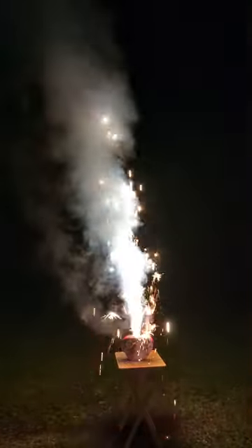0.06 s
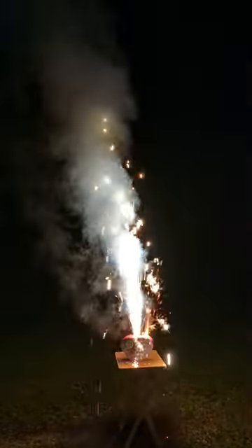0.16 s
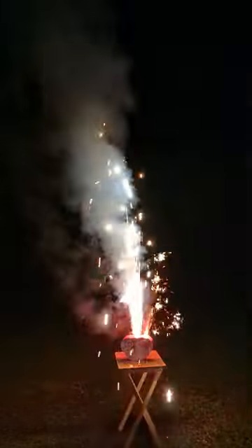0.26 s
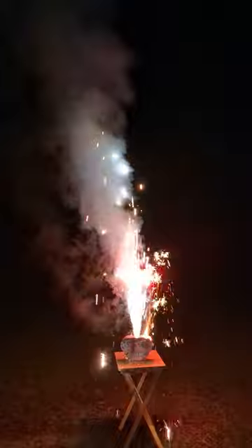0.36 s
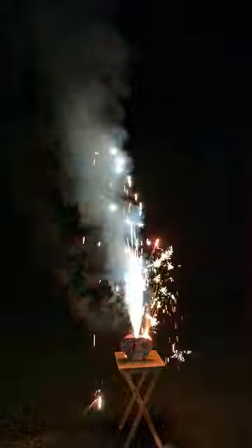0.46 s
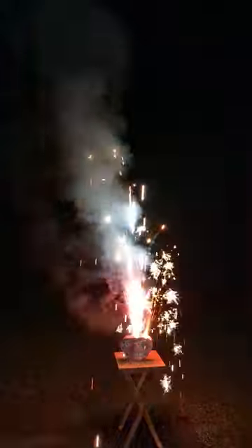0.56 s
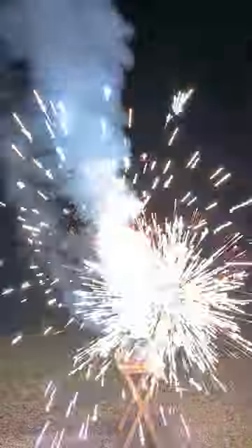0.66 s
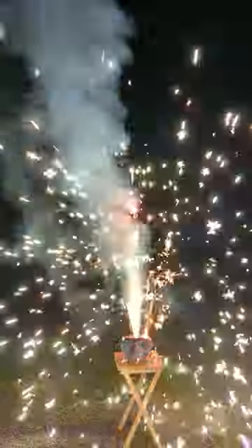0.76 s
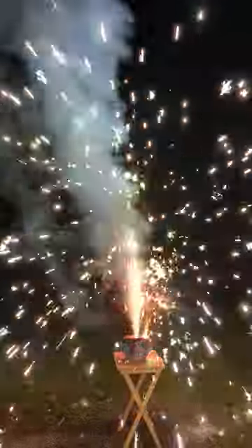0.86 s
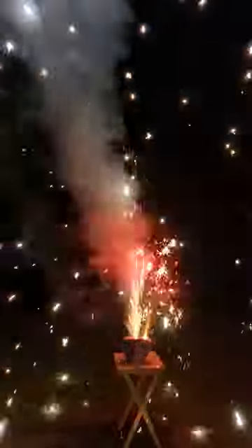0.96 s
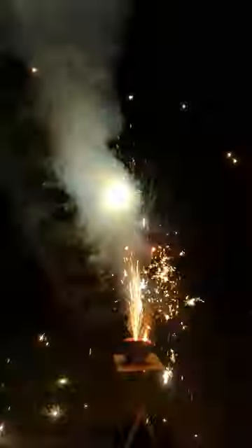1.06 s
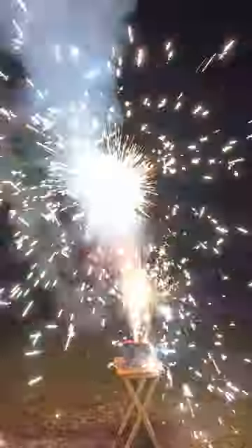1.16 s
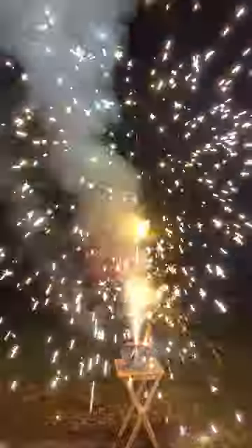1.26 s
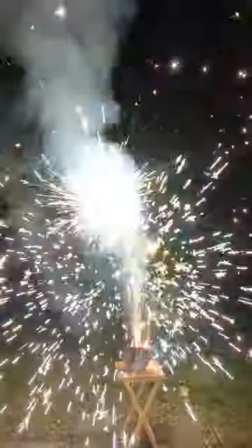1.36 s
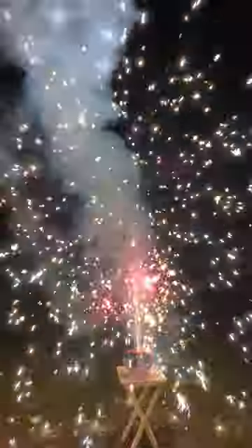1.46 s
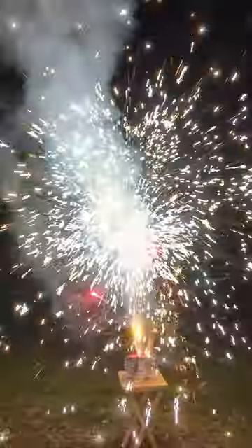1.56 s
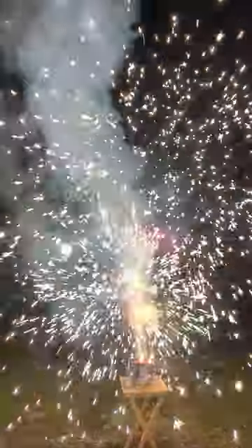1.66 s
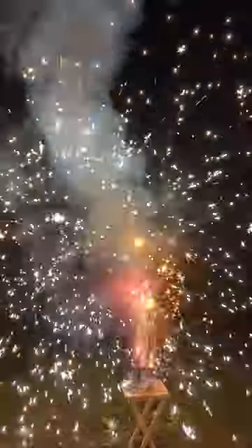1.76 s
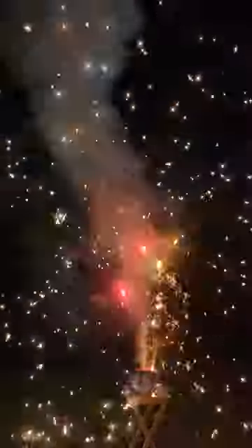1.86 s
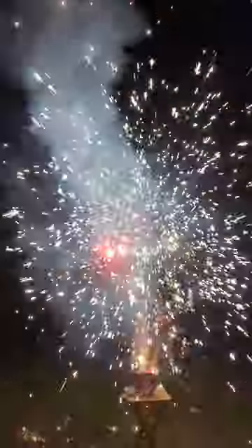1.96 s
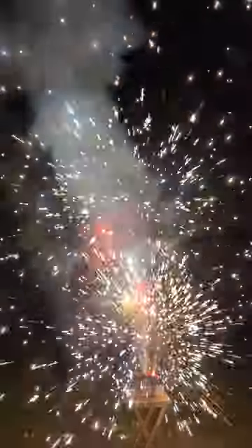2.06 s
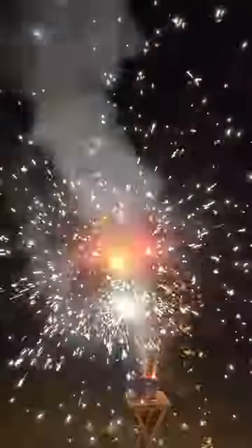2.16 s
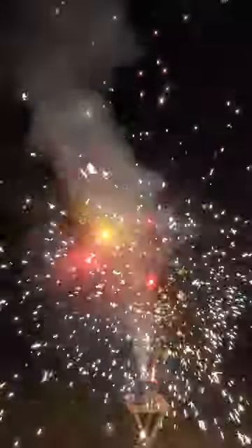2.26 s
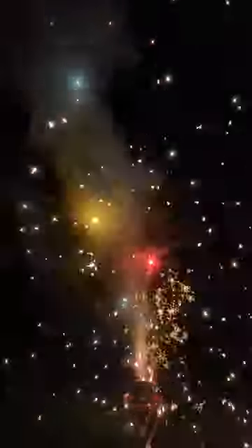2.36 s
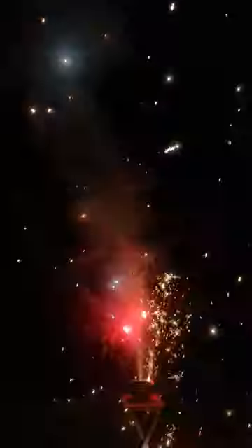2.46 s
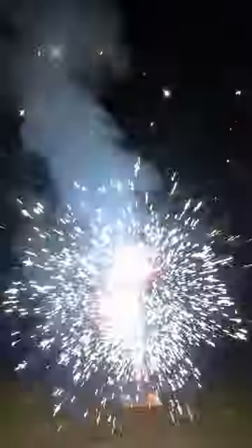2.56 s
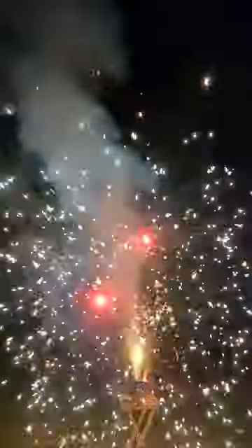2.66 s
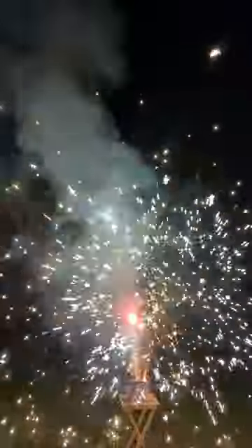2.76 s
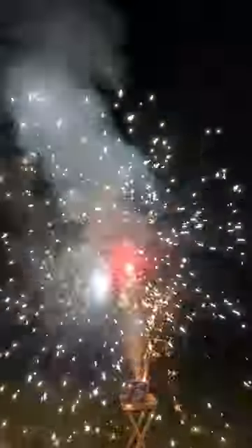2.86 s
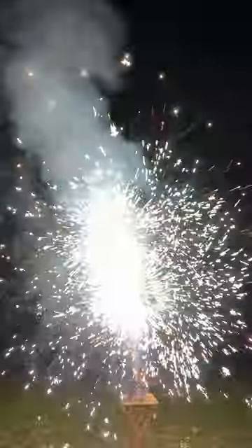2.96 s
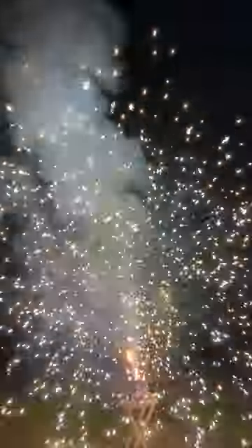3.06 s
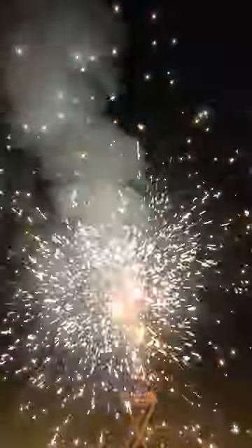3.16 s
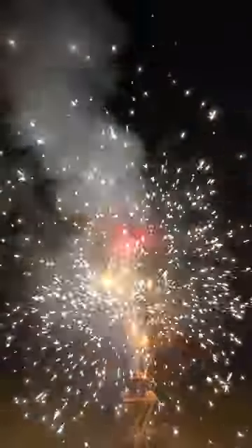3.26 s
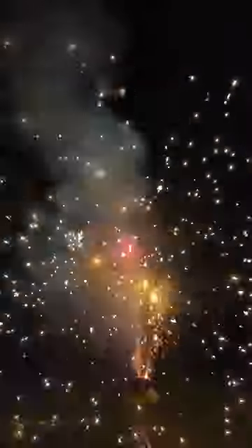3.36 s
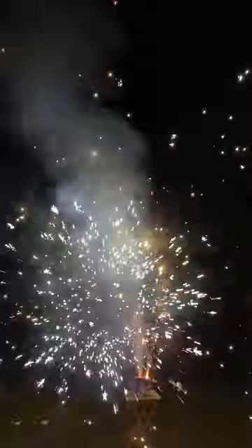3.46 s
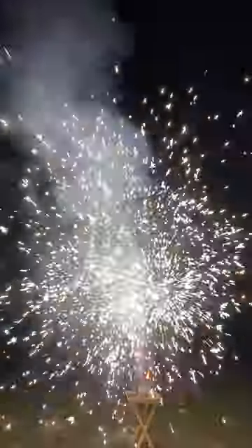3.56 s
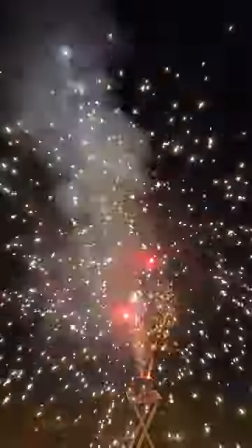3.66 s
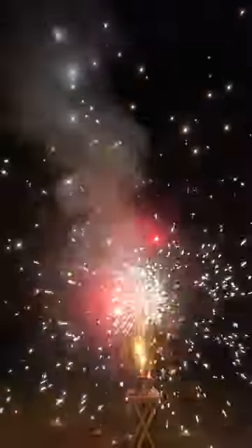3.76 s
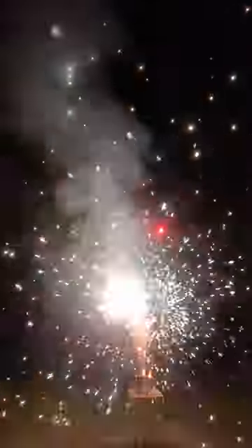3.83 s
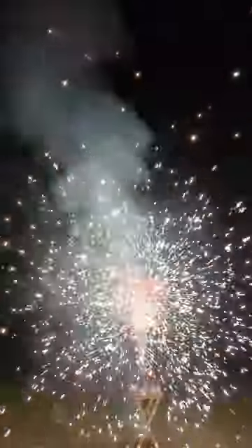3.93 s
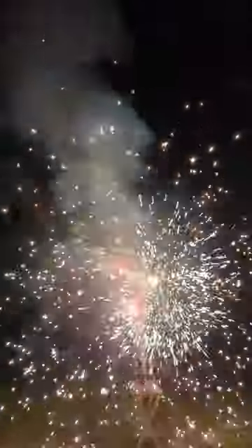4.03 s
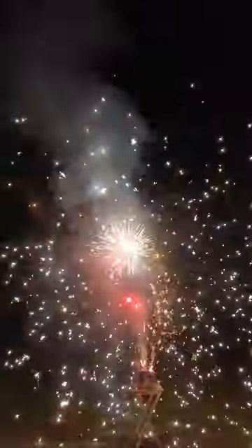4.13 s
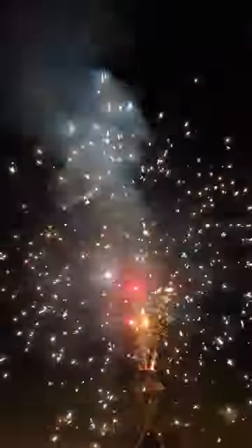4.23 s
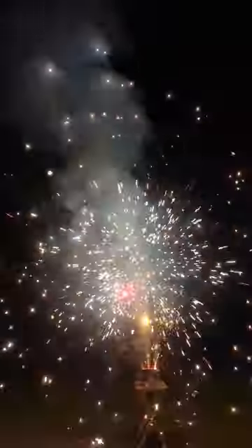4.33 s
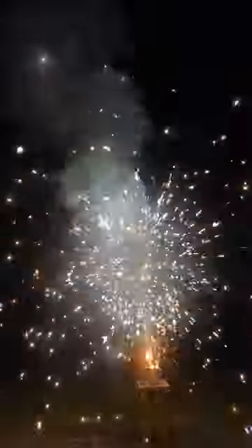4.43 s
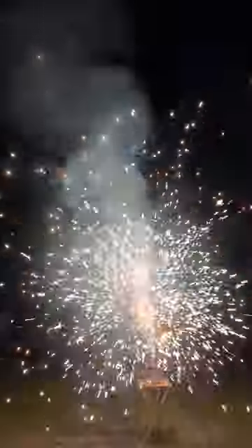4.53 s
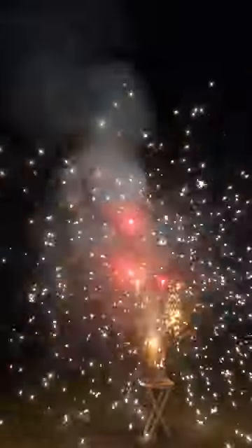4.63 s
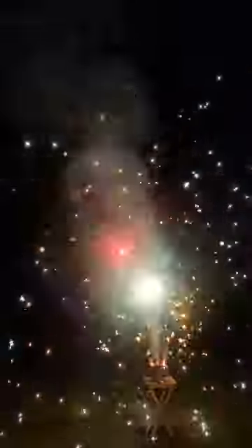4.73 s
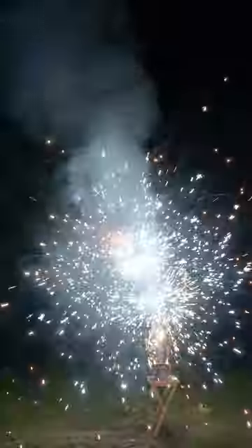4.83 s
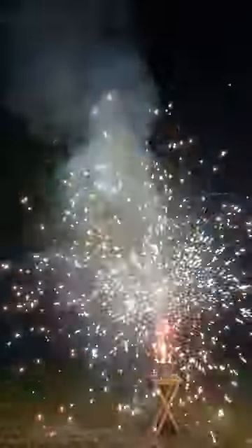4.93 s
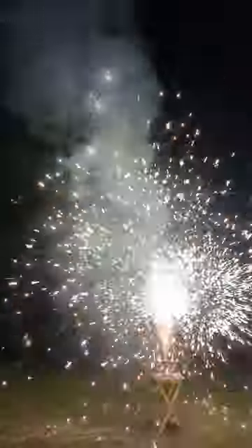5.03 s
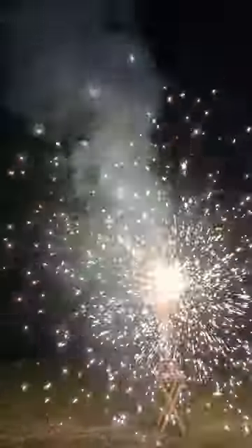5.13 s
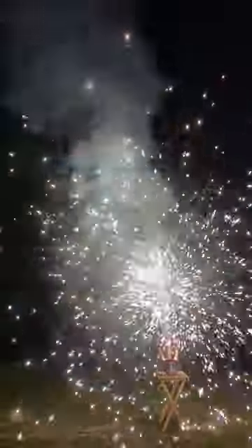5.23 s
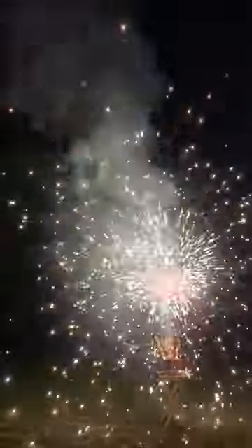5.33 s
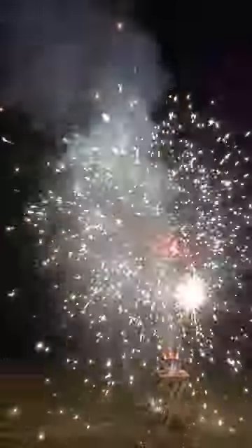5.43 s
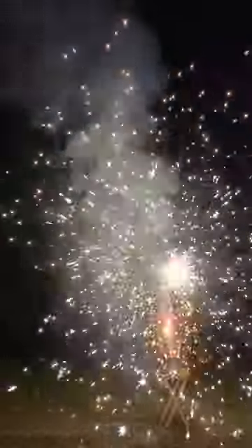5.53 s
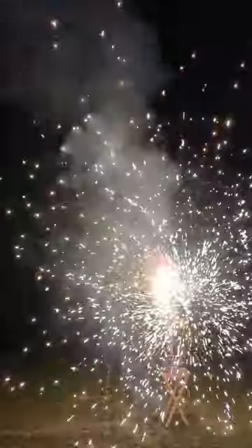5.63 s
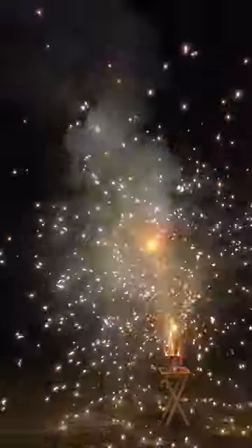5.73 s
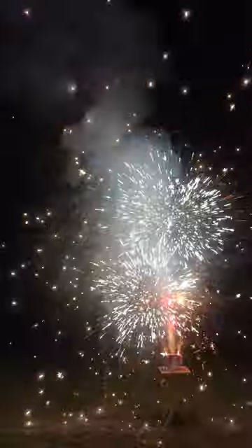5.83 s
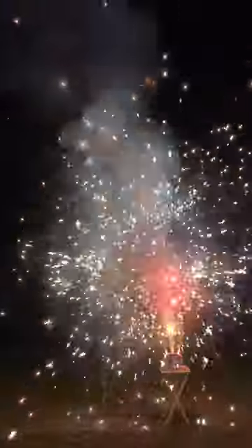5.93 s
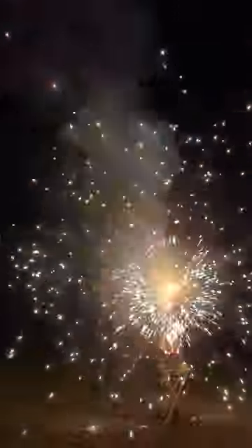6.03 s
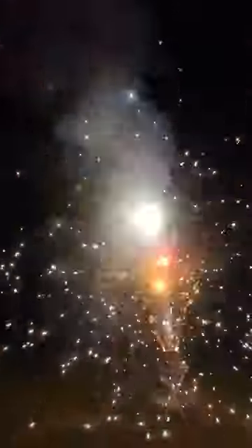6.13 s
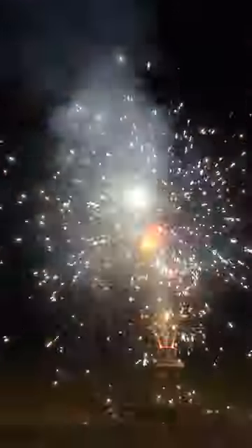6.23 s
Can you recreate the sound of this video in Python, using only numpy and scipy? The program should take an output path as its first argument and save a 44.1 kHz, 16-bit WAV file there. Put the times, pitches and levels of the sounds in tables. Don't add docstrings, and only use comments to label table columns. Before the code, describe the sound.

A fountain firework hisses faintly, then bursts into a dense, irregular run of sharp cracks and fizzing spark sprays, close up outdoors at night.

```python
import sys
import numpy as np
from scipy import signal
from scipy.fft import rfft, irfft, next_fast_len
from scipy.io import wavfile
from scipy.ndimage import uniform_filter1d

SR = 44100
rng = np.random.default_rng(int(sys.argv[2]) if len(sys.argv) > 2 else 0)


def output_pcm(signal):
    pcm = np.clip(np.atleast_2d(signal).T, -1, 1) * 32767
    wavfile.write(sys.argv[1], SR, np.round(pcm).astype(np.int16))


def elevation(decibels):
    levels = np.asarray(decibels, float)
    return 10 ** (levels / 20)


N = 277389

# (t/s, left push, right push, left ring, right ring)
BLASTS = [(0.647, 0, 0, 2.8, 2.4), (0.8353, 0, 0.015, 0, -0.15), (1.1408, 0.016, 0.015, -1.1, -0.8),
          (1.2102, -0.308, 0, 4.262, 0), (1.4217, 0, 0.015, 0, -0.1), (1.6411, 0.008, 0.04, 0, -0.4),
          (1.6893, 0.023, 0, -0.152, 0), (1.7293, -0.138, 0, 0.885, 0), (2.1641, 0.03, 0, -0.178, 0),
          (2.2176, -0.292, 0, 1.429, 0), (2.8344, -0.33, 0, 2.501, 0), (2.9305, 0.208, 0, -0.95, 0),
          (2.9369, 0.259, 0, -1.401, 0), (3.604, 0, 0.012, 0, -0.1), (3.9702, 0, 0.05, 0, -0.3),
          (4.1829, -0.02, 0, 0.3, 0), (4.3503, 0.022, -0.033, -0.5, 0.45), (4.793, 0, 0.015, -0.193, 0),
          (4.8243, -0.233, 0, 1.311, 0), (5.3657, 0.071, 0, -0.208, 0), (5.4053, -0.176, 0, 1.635, 0),
          (5.6598, 0, 0.02, 0, -0.11), (5.9016, 0.075, 0, -0.348, 0), (6.1912, -0.266, 0, 1.385, 0)]


def evened(x):
    return x / np.sqrt(np.mean(x ** 2) + 1e-20)


def read(points, hz):
    f, *values = np.transpose(points)
    return np.array([np.interp(np.log(hz + 1), np.log(f + 1), v) for v in values])


def train(seconds, sizes):
    out = np.zeros(N)
    np.add.at(out, np.round(np.asarray(seconds) * SR).astype(int), sizes)
    return out


def stars():
    # (t/s, spark spray level/dB, excess over the limiter ceiling/dB)
    heavy = [
        (0.647, -23.5, 8.5),
        (1.2082, -26, 15),
        (2.8364, -24, 8.5),
        (2.9369, -22.5, 26),
    ]
    full = [
        (2.1641, -26, 11),
        (3.8925, -22, 25),
        (5.6247, -22.5, 20),
        (6.0638, -24, 10.5),
        (6.1912, -23, 12),
    ]
    deep = [(0.8353, -22.5, 14), (1.1408, -22.5, 21), (1.4217, -22, 17), (1.6411, -25.5, 13.5),
            (1.6893, -31, 9.5), (2.2176, -28, 13), (2.563, -28, -1), (2.582, -25.5, 34),
            (2.7634, -25.5, 8.5), (2.9301, -23, -4), (3.5583, -25.5, 16), (3.9702, -37, 5),
            (4.3503, -23, 13.5), (4.793, -29, 1), (4.8242, -29.5, 11.5), (5.3657, -27, 11),
            (5.4053, -25, 13.5), (5.6598, -32, 16.5)]
    plain = [(1.5966, -38, 17), (0.6851, -25, 20.5), (1.3515, -23.5, 19), (1.4047, -35, 24),
             (1.5506, -18.5, 21), (1.5765, -33, 40), (1.938, -29.5, 7), (1.9645, -27.5, 16),
             (2.0819, -20.5, 27), (2.0864, -45, 5), (2.5922, -28.5, 23), (2.9828, -29, 13),
             (3.0085, -36, 16), (3.1777, -23.5, 7), (3.1939, -26, 19), (3.5311, -24.5, 13),
             (3.9076, -32, 12), (4.0509, -23, 14.5), (4.0561, -47, 5), (4.1829, -27, 8), (4.5297, -44, 6),
             (4.5498, -21, 11), (5.152, -20.5, 20), (5.183, -36, 17.5), (5.8674, -22, 9),
             (1.7293, -24.5, 15), (5.9016, -50, 18)]
    thin = [(1.1202, -28.5, 4), (1.9481, -27.5, 19), (2.25, -25.5, 18), (2.9766, -30, 22),
            (2.9989, -21, 15), (3.1707, -22.5, 13), (3.2506, -25, 14), (3.2825, -27.5, 14),
            (3.4602, -30.5, 10.5), (3.5514, -21.5, 29), (3.604, -31, 14), (3.7548, -25, 11.5),
            (3.812, -27.5, 18.5), (3.9789, -21, 12), (4.2973, -37, 6), (4.4447, -25.5, 13),
            (4.9219, -27.5, 16), (5.0147, -26, 16), (5.028, -25, 17), (5.242, -29.5, 19.5),
            (5.2666, -30, 13.5), (5.4854, -25, 11), (5.5822, -25.5, 21), (5.8561, -42, 10),
            (6.237, -25, 20.5)]
    dry_stars = [
        (3.785, -34, 5),
        (3.8648, -42, 14),
        (5.0488, -36, 13),
        (5.0802, -29.5, 11.5),
        (5.5304, -29, 15),
    ]
    faint = [(2.6037, -30.5, 14), (5.3396, -45, 6), (4.16, -45, 5), (1.3, -32.5, 0), (1.51, -45, -3),
             (2.2021, -30, -3), (2.39, -41, 3.5), (3.9156, -31, 13), (4.8725, -26, 18)]
    spits = [
        (0.2765, -70, 0),
        (0.5775, -70, 0),
    ]
    # (crack peak after the limiter/dB, low body level/dB)
    kinds = [
        (-19, 11),
        (-13, 5),
        (-13, 2),
        (-13, 0.2),
        (-13, -3),
        (-14.5, -7),
        (-19.5, -1.1),
        (-31, -14),
    ]
    groups = (heavy, full, deep, plain, thin, dry_stars, faint, spits)
    bursts = []
    for group, kind in zip(groups, kinds):
        bursts += [tuple(star) + tuple(kind) for star in group]
    bursts = np.array(sorted(bursts))
    for s, *_ in BLASTS:
        bursts[abs(bursts[:, 0] - s) < .0025, 0] = s
    return bursts


def cracks(bursts, smear_s=0.0007, tail_db=-22, tail_s=.03, gain_db=0.07, echo_db=0.5):
    # (f/Hz, left level/dB, right level/dB)
    crack = [(150, 7, 12), (350, 12, 13), (700, 13, 13), (1200, 11, 8), (2000, 11, 3), (3200, 8, 0),
             (5000, 7, 1), (7000, 7, 0), (9000, 7, 2), (11000, 11, 4), (13000, 8, 4), (14300, 4, 2),
             (15500, 2, 0), (16500, -7, -10)]
    # (f/Hz, left level/dB, right level/dB)
    ground = [(150, 6, 12), (350, 9, 9), (700, 10, 10), (1200, 8, 9), (2000, 6, 6), (3200, 2, 5),
              (5000, 1, 4), (7000, 1, 8), (9000, 1, 9), (11000, 2, 10), (13000, -2, 4), (14300, -5, 0),
              (15500, -6, -1), (16500, -16, -10)]
    lowest_ms, higher_ms, vary_db = 2.15, .15, .8
    later_ms = np.array([[.5], [0]])
    snap, lull_s, edge_hz = .4, .11, 15800
    size, lead, turns = 2048, 200, .43
    hz, t = np.fft.rfftfreq(size, 1 / SR), np.arange(size) / SR
    lag = np.exp(-2j * np.pi * (turns * (np.log((hz + 30) / 8000) + 1) + hz * lead / SR))
    direct = elevation(read(crack, hz)) * lag
    echo_colour = elevation(read(ground, hz) + echo_db) * lag
    blur = np.exp(-t / .00025)
    count = len(bursts)
    rough, scatter = rng.standard_normal((count, 2, 2, size)).transpose(1, 0, 2, 3)
    gaps = np.diff(bursts[:, 0], prepend=0)
    heights, sizes = rng.standard_normal((count, 2)).T
    out = np.zeros((2, N + size))
    for (s, *_, db, body_db), gap, high, big, grass, air in zip(bursts, gaps, heights, sizes, rough, scatter):
        echo_ms = lowest_ms + higher_ms * high ** 2
        shaded = rfft(abs(air[0]) * np.sign(grass[0] + 1) * blur)
        shaded = np.where(hz > 2500, shaded / np.sqrt(np.mean(abs(shaded) ** 2)), 1)
        shock = direct * np.array([np.ones_like(shaded), shaded])

        after = np.maximum(t - (echo_ms + later_ms) / 1000, 0)
        bounce = grass * (after > 0) * np.exp(-after / smear_s)
        bounce *= np.sqrt(1 - snap ** 2) / np.linalg.norm(bounce, axis=1, keepdims=True)
        bounce += snap * (after > 0) * (after <= 1 / SR)
        bounce += air * (after > 0) * elevation(tail_db - 60 * after / tail_s)

        top = (hz < edge_hz) | (gap > lull_s)
        tone = top * elevation(body_db / (1 + (hz / 1500) ** 2))
        burst = irfft(tone * (shock + rfft(bounce) * echo_colour))
        at = round(s * SR) - lead
        level = elevation(db + vary_db * big + gain_db)
        out[:, at:at + size] += (level * burst)[:, :N + size - at]
    return out[:, :N]


def sparks(bursts, catch_s=0.02, gain_db=2.0):
    # (f/Hz, level per Hz/dB)
    fizz = [(60, -21), (180, -15.5), (400, -15.5), (900, -9.5), (2100, -3.5), (4300, -4), (5600, -3),
            (6800, 1), (8200, -1.5), (10800, 6), (12500, 2), (14000, -7), (15200, -3.5), (17000, -30)]
    # (band top f/Hz, t60/s, left-right likeness, left-right level/dB)
    burn = [(556, 0.75, 0.96, -1), (1497, 0.87, 0.42, -1.5), (4040, 0.72, 0.0063, -3.5),
            (9780, 0.58, 0.032, -2.5), (13000, 0.43, 0.05, -1.5), (20000, 0.42, .03, 0)]
    s, spray_db = bursts.T[:2]
    pops_per_s, spread_db = 18000, 1.3
    size = next_fast_len(N)
    hz, t = np.fft.rfftfreq(size, 1 / SR), np.arange(SR) / SR
    chance = rng.random((N, 3)).T
    height = rng.standard_normal((N, 3)).T
    big = rng.exponential(1, (N, 3)).T
    pops = (chance < pops_per_s / SR) * height * elevation(spread_db * np.minimum(big, 4))
    z = rfft(pops, size) * elevation(read(fizz, hz))
    z /= np.sqrt(np.mean(irfft(z, size) ** 2))
    lit = train(s, elevation(2 * spray_db))
    out, low = np.zeros((2, N)), 0
    for top, t60, same, pan_db in burn:
        own_left, own_right, shared = irfft(z * ((hz >= low) & (hz < top)), size)[:, :N]
        same, low = np.clip(same, 0, 1), top
        swell_and_die = (1 - np.exp(-t / catch_s)) ** 2 * elevation(-120 * t / t60)
        power = signal.oaconvolve(lit, swell_and_die)[:N]
        band = np.sqrt(1 - same) * np.array([own_left, own_right]) + np.sqrt(same) * shared
        out += band * np.sqrt(abs(power)) * elevation([[pan_db / 2], [-pan_db / 2]])
    return elevation(gain_db) * out


def jolts(bursts, late_s=.00018, blunt_hz=480., turns=.243, case_hz=75.3, case_q=1.43):
    nudge_push, nudge_ring = 0.0065, 0.024
    ring_hz, swell_s, die_s, crest_s = 51.6, .03, .01185, .00884
    lead, shift = 60, .076
    floor_s, floor = .0029, -.16
    nudges = [(s, nudge_push, nudge_push, *nudge_ring * rng.standard_normal(2))
              for s, *_, db, _ in bursts if db > -30]
    s, *ports = np.transpose(list(BLASTS) + nudges)
    hz, t = np.fft.rfftfreq(4096, 1 / SR), np.arange(4096) / SR
    lag_turns = turns * np.log((hz + 30) / 1000) + shift + hz * (late_s + lead / SR)
    lag = np.exp(-2j * np.pi * lag_turns)
    w = 1j * hz / case_hz
    bass_cut = w * w / (w * w + w / case_q + 1)
    shove = irfft(bass_cut / (1 + (hz / blunt_hz) ** 2) * lag)
    slope = np.gradient(shove)
    echo = floor * np.roll(slope / slope.max(), round(floor_s * SR))
    shove = elevation(1.5) * shove / shove.max() + echo
    ring = np.exp(-t / die_s) * (1 - np.exp(-t / swell_s)) ** 2 * np.cos(2 * np.pi * ring_hz * (t - crest_s))
    out = []
    for push, swing in zip(ports[:2], ports[2:]):
        thump = signal.oaconvolve(train(s, push), shove)[lead:N + lead]
        out.append(thump + signal.oaconvolve(train(s, swing), ring)[:N])
    return np.array(out)


def flame(patchy_db=.6):
    # (f/Hz, left level per Hz/dB, right level per Hz/dB)
    hiss = [(30, -33, -34), (60, -19, -19), (150, -17, -16), (235, -29, -30), (520, -9, -11),
            (760, -15, -16), (1120, -13, -8), (1260, -13, -13), (1410, -8, -11), (1650, -21, -16),
            (2000, -17, -17), (4000, -25, -26), (11000, -27, -27), (15500, -33, -33)]
    # (f/Hz, width/Hz, level/dB)
    tube = [(231, 74, -15), (352, 260, 5), (730, 100, -3), (1292, 103, -26), (1398, 63, 7), (1800, 120, -3),
            (2620, 370, -4), (3500, 300, 6), (5570, 900, 0), (11800, 1400, 2.5), (5300, 150, -5),
            (5800, 150, -7)]
    # (f/Hz, left-right likeness)
    likeness = [(60, 1), (180, 0.91), (550, 0.98), (1650, 0.12), (4970, -0.25), (15000, -0.22)]
    # (t/s, level/dB)
    strength = [
        (0, -49.5),
        (.3, -49),
        (.62, -47),
        (1, -43),
        (2.5, -47),
        (4.7, -49),
        (6.29, -49),
    ]
    frames, hz = N // 256 + 5, np.fft.rfftfreq(1024, 1 / SR)
    a, b, c, d, patches = rng.standard_normal((frames, 513, 5)).T
    patches = evened(uniform_filter1d(uniform_filter1d(patches, 10, 0), 12, 1))
    same = np.clip(read(likeness, hz)[0], -1, 1)[:, None]
    left = a + 1j * b
    right = same * left + np.sqrt(1 - same ** 2) * (c + 1j * d)
    tube_db = sum(db * np.exp(-(2 * (hz - f) / width) ** 2) for f, width, db in tube)
    colour_db = (read(hiss, hz) + tube_db)[:, :, None]
    z = np.array([left, right]) * elevation(colour_db + patchy_db * patches)
    level_db = np.interp(np.arange(N) / SR, *np.transpose(strength))
    return elevation(level_db) * evened(signal.istft(z, nperseg=1024, noverlap=768)[1][:, :N])


def dips(bursts, back_s=0.017):
    before, after = 1000, 3000
    ahead_s, early_s, bend = .015, .0015, 1.2
    t, dip_db = np.arange(-before, after) / SR, np.zeros(N + after)
    sink = np.clip((t + ahead_s) / (ahead_s - early_s), 0, 1) ** bend
    shape = np.where(t < 0, sink, np.exp(-t / back_s))
    for s, _, excess_db, *_ in bursts:
        at = slice(round(s * SR) - before, round(s * SR) + after)
        dip_db[at] = np.maximum(dip_db[at], max(excess_db, 0) * shape)
    return elevation(-dip_db[:N])


def scene():
    bursts = stars()
    hiss = flame() + sparks(bursts)
    edge = signal.firwin(401, 15800, window=("kaiser", 8), fs=SR)
    bed = signal.oaconvolve(hiss * dips(bursts), edge[None], "same")
    others = bursts[abs(bursts[:, :1] - np.transpose(BLASTS)[0]).min(1) > .005]
    return bed + cracks(bursts) + jolts(bursts) * dips(others)


def low_pass(x):
    return signal.sosfilt(signal.butter(12, 16840, fs=SR, output="sos"), x)


def record(dry):
    edge = signal.firwin(301, 16600, window=("kaiser", 10), fs=SR)
    mix = signal.oaconvolve(dry, edge[None], "same")
    return low_pass(mix)


dry = scene()
out = record(dry)
output_pcm(out)
```